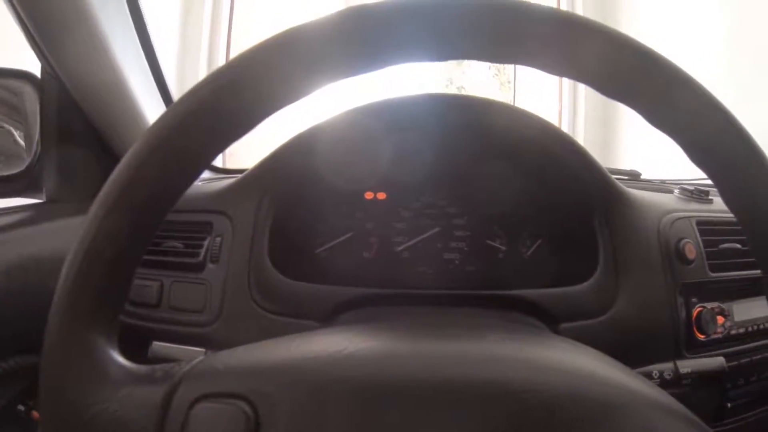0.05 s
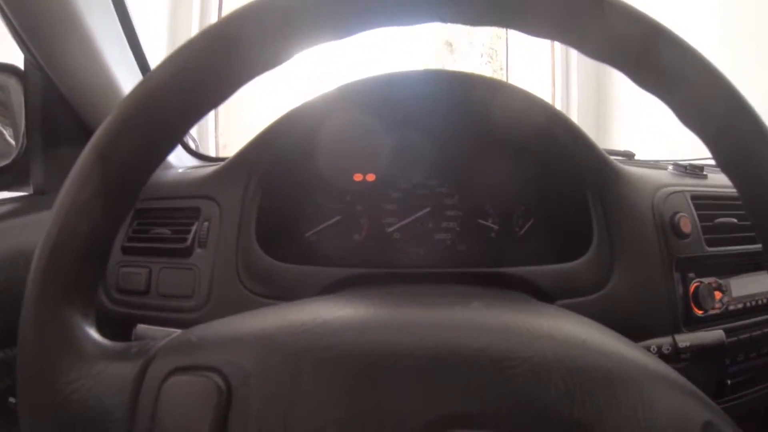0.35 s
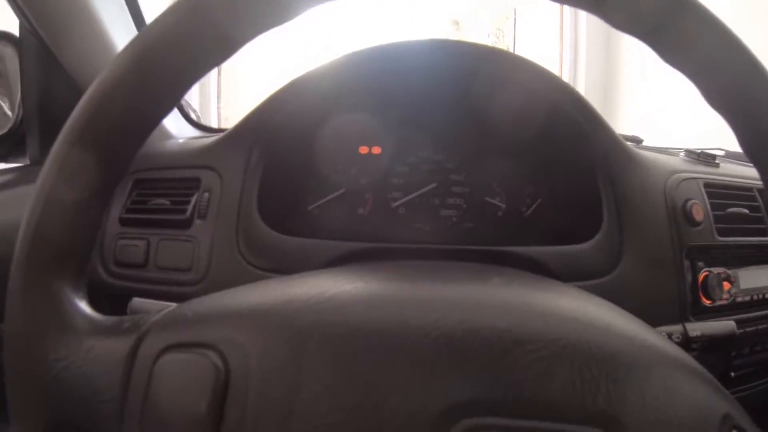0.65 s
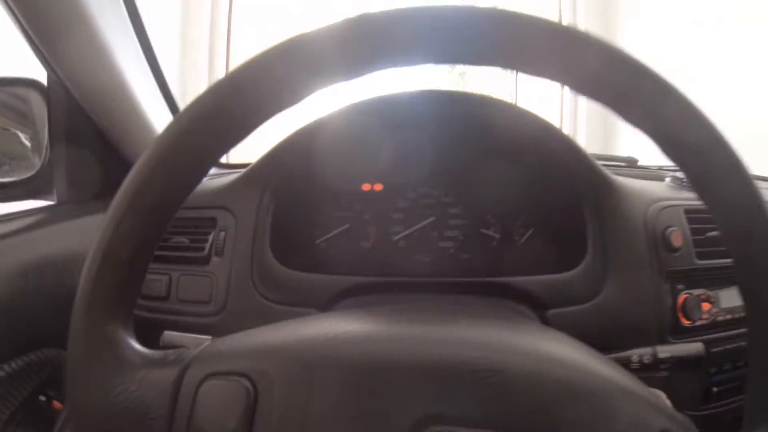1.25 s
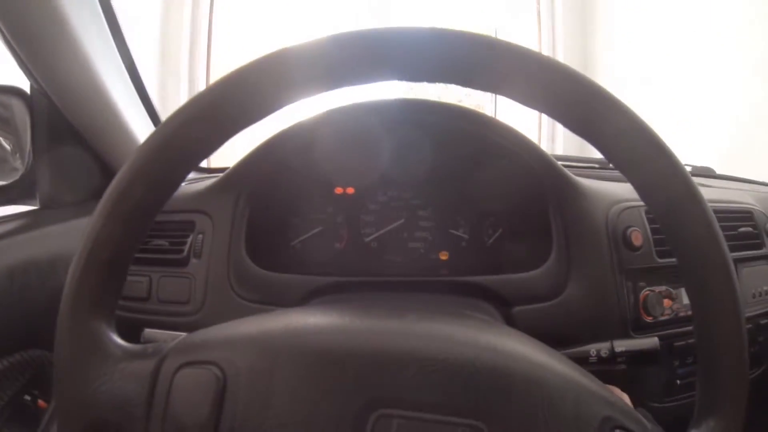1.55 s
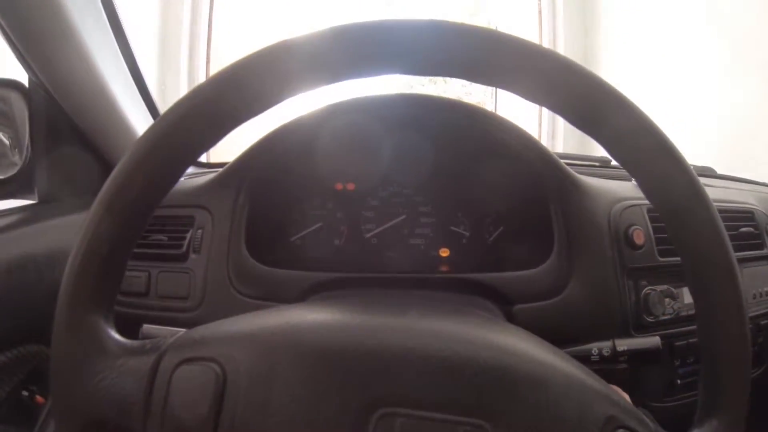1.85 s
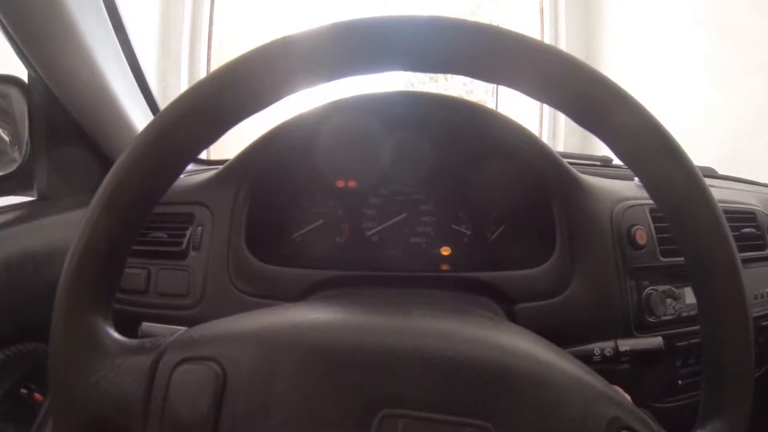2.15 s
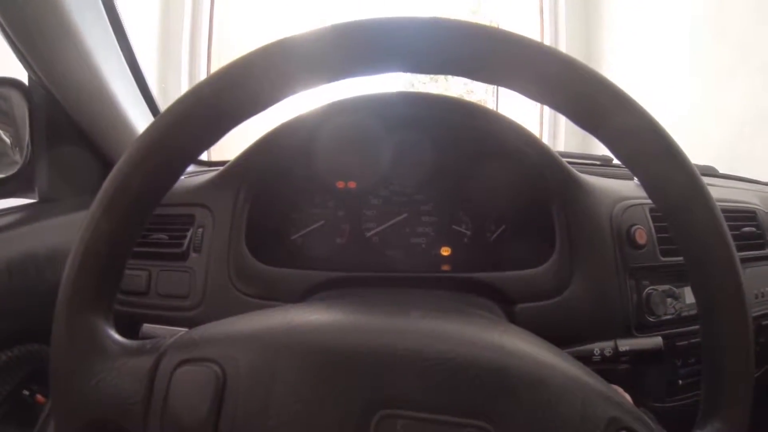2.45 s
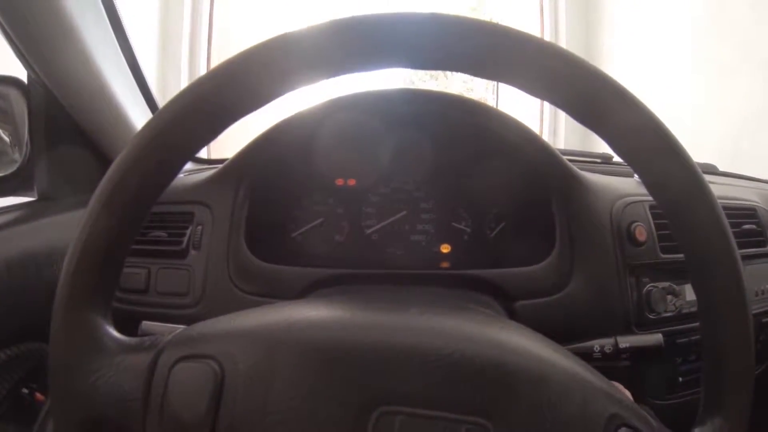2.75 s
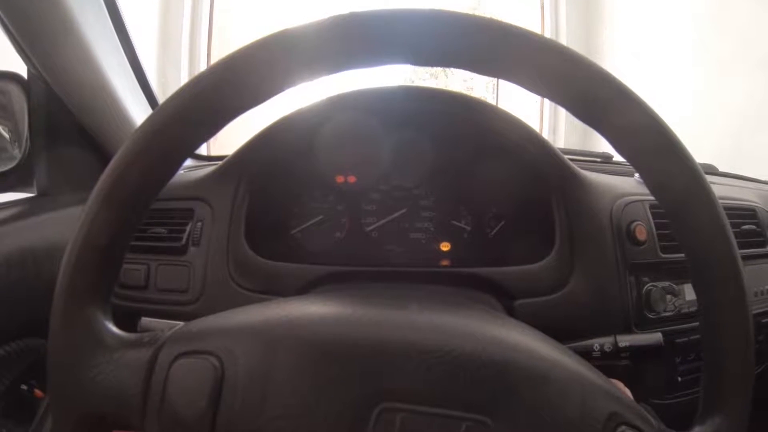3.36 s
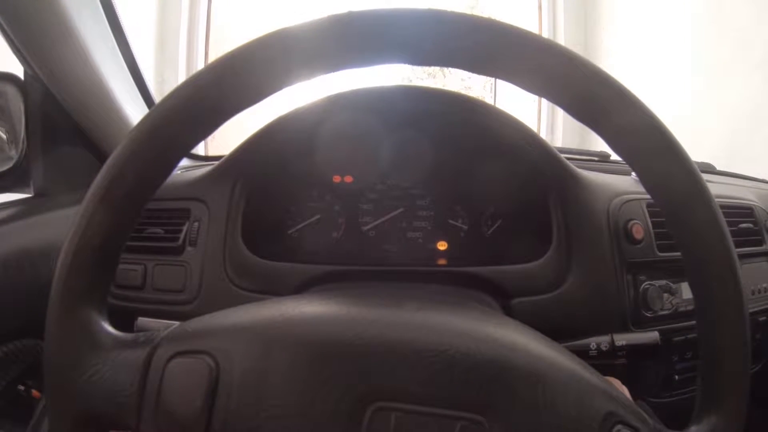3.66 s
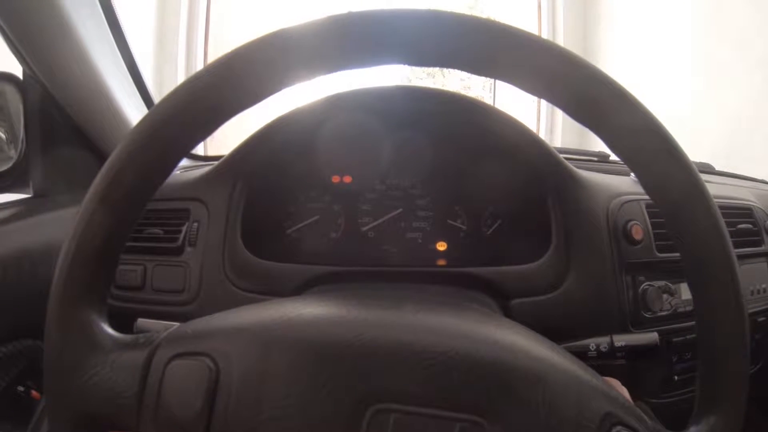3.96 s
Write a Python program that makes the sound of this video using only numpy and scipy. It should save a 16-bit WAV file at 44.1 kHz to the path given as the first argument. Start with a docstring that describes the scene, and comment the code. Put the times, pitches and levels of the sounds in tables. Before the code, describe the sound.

A car starts, heard close up from the driver's seat. Clothes rustle, a pedal squeaks and thuds, and the key clicks. The starter grinds and whines in pulses, then the engine catches with low, uneven thumping.

```python
"""A parked car starting, heard close up from the driver's seat on one microphone.
Over a faint cabin rumble, clothes rustle, a pedal squeaks and thuds home, and the key clicks round.
At 1.6 s the starter's pinion crashes in and spins up. From 2 s its gears whine and rasp under each
compression stroke, sagging in pitch against the resonances of the housing. Just after 3 s the engine
first fires; it throws the starter off and begins to run with a low, uneven thumping."""
import sys
import numpy as np
from scipy import signal
from scipy.fft import rfft, irfft
from scipy.io import wavfile

SR = 44100
rng = np.random.default_rng(int(sys.argv[2]) if len(sys.argv) > 2 else 0)


def transcribe(signal):
    """Save signal, clipped to [-1, 1], as a 16-bit WAV file at the path in sys.argv[1]."""
    frames = np.atleast_2d(signal).T
    limited = np.clip(frames, -1, 1)
    pcm = np.round(limited * 32767).astype(np.int16)
    wavfile.write(sys.argv[1], SR, pcm)


N = 176400
T = np.arange(N) / SR

# the starter spinning up: (time [s], gear pitch [Hz], grinding level [dB])
STARTER_RUN_UP = [(1.615, 1387, -44), (1.64, 1425, -34), (1.70, 1520, -29.5), (1.78, 1914, -27.5),
                  (1.87, 2069, -27.5), (1.93, 1911, -24.5), (2.03, 1750, -37), (2.10, 1660, -71)]
MESH_S = 1.618  # the pinion meets the ring gear
LOW_GEAR_RATIO = .56  # pitch of the slower gear pair over that of the faster
SAG_S = .082  # how long a compression slows the starter


def from_db(db):
    """Decibels to gain."""
    return 10 ** (np.asarray(db) / 20)


def rms_one(x):
    """Scale to unit power."""
    return x / np.sqrt(np.mean(x ** 2) + 1e-20)


def in_time(rows):
    """Each column of a curve at every sample."""
    times, *columns = np.transpose(rows)
    return [np.interp(T, times, column) for column in columns]


def coloured(spectrum, x):
    """Shape x by (frequency [Hz], level [dB]) points, falling away below the first; rms 1."""
    hz, db = np.transpose(spectrum)
    f = np.maximum(np.fft.rfftfreq(N, 1 / SR), 1)
    skirt = np.minimum(f / hz[0], 1) ** 2
    gain = from_db(np.interp(np.log(f), np.log(hz), db))
    return rms_one(irfft(rfft(x) * skirt * gain, N))


def noise(spectrum):
    """Steady noise of a given colour."""
    return coloured(spectrum, rng.standard_normal(N))


def drift(rate_hz):
    """Random wander, mostly slower than rate_hz; rms 1."""
    rolloff = 1 + (np.fft.rfftfreq(N, 1 / SR) / rate_hz) ** 2
    return rms_one(irfft(rfft(rng.standard_normal(N)) / rolloff, N))


def envelope(start, attack, hold, release):
    """Straight rise, hold and exponential fall, all in seconds."""
    rise = np.clip((T - start) / attack, 0, 1)
    return rise * np.exp(-np.maximum(T - start - attack - hold, 0) / release)


def tone(hz):
    """A sine of rms 1 on a moving pitch."""
    return np.sqrt(2) * np.sin(2 * np.pi * np.cumsum(hz) / SR)


def dulled(x, hz):
    """Second-order low-pass."""
    return signal.sosfilt(signal.butter(2, hz, fs=SR, output="sos"), x + 1e-18)


def struck(hits, modes, scatter_db=1.5):
    """Every hit rings every mode with a strength of its own."""
    times, db = np.transpose(hits)
    out = np.zeros(N)
    for hz, mode_db, t60 in modes:
        blows = np.zeros(N)
        scatter = scatter_db * rng.standard_normal(len(times))
        blows[(times * SR).astype(int)] = from_db(db + mode_db + scatter)
        r, w = np.exp(-np.log(1000) / (t60 * SR)), 2 * np.pi * hz / SR
        out += signal.lfilter([0, np.sin(w)], [1, -2 * r * np.cos(w), r * r], blows + 1e-18)
    return out


def resonate(x, peaks):
    """Narrow resonances in parallel."""
    out = 0
    for hz, width, db in peaks:
        r, w = np.exp(-np.pi * width / SR), 2 * np.pi * hz / SR
        feed = np.array([1, 0, -1]) * (1 - r * r) / 2
        out += from_db(db) * signal.lfilter(feed, [1, -2 * r * np.cos(w), r * r], x + 1e-18)
    return out


def cabin_reverb(x, t60=.11, wet_db=1.5):
    """Dense, quickly dying reflections from glass and trim around the microphone; power is kept."""
    tail = rng.standard_normal(N) * from_db(-60 * T / t60)
    wet = signal.fftconvolve(x, tail[:SR // 4] / np.sqrt(np.sum(tail ** 2)))[:N]
    return (x + from_db(wet_db) * wet) / np.hypot(1, from_db(wet_db))


def engine_bay(x):
    """Add a few early echoes from the bulkhead and bonnet."""
    # paths round the bay: (delay [s], level [dB])
    echoes = [(.0047, -17), (0.0129, -12.5), (0.0177, -11), (.0287, -20.5), (.041, -13)]
    return x + sum(from_db(db) * np.interp(T - delay, T, x, left=0) for delay, db in echoes)


def cabin_tone():
    """The room tone of the parked car: a faint, steady rumble."""
    # its spectrum: (frequency [Hz], level [dB])
    colour = [(12, -21), (20, 4.5), (38, -6.5), (97, -15), (347, -34), (387, -37), (1390, -65.5),
              (1830, -54), (2160, -44.5), (3970, -42.5), (15000, -54)]
    return from_db(-54) * noise(colour)


def rustle():
    """The driver's foot and clothes rustle near the microphone."""
    # the driver's movement: (time [s], level [dB])
    movement = [(0, -66.5), (.2, -57), (.45, -58.5), (.7, -60), (.85, -63), (1.2, -63), (1.5, -65.5)]
    # rubbing cloth: (frequency [Hz], level [dB])
    cloth = [(150, 1.5), (600, -6.5), (1200, -10.5), (2500, -15), (4000, -27), (8000, -37)]
    return from_db(in_time(movement)[0]) * noise(cloth)


def pedal_squeak():
    """Down in the footwell the pedal gives one short, wavering squeak."""
    # its partials: (frequency [Hz], level [dB], waver [share of frequency])
    partials = [(1700, -54, 0.0056), (1810, -55, 0.02), (2065, -55.5, 0.011), (3420, -62, 0.012),
                (3763, -73, 0.0066), (5180, -69, 0.011), (8500, -71.5, .005)]
    squeak = sum(from_db(db + 3.6 * drift(70)) * tone(hz * (1 + waver * drift(110)))
                 for hz, db, waver in partials)
    return squeak * envelope(start=.22, attack=.011, hold=.05, release=.054)


def clicks():
    """Pedal, key and solenoid click, each a short burst of noise."""
    # the clicks: (time [s], level [dB], t60 [s], low-pass [Hz])
    contacts = [(0.439, -42.5, .06, 900), (0.472, -34.5, 0.14, 1200), (0.535, -42.5, 0.14, 1200),
                (0.6, -47, 0.048, 1500), (.66, -52.5, 0.39, 3000), (.765, -50.5, .035, 3480),
                (0.898, -44, 0.047, 1590), (1.080, -38.5, 0.033, 3340), (1.117, -36.5, 0.12, 1310),
                (1.162, -41.5, 0.052, 1510), (1.203, -42.5, 0.067, 1510), (1.240, -50, 0.043, 1780),
                (1.565, -46.5, 0.36, 1470), (1.594, -30.5, 0.081, 7000)]
    # their common spectrum: (frequency [Hz], level [dB])
    colour = [(200, -15.5), (500, -1), (850, 5), (1350, -5), (1900, 4.5), (2600, -8.5), (3500, -5),
              (5000, -21), (7000, -22), (8500, -18), (15000, -15)]
    crack = noise(colour)
    return sum(dulled(from_db(db) * envelope(start, .0012, .0013, t60 / np.log(1000)) * crack, hz)
               for start, db, t60, hz in contacts)


def lock_knocks():
    """At arm's length the ignition lock knocks and rings as the key turns."""
    # blows on the lock: (time [s], level [dB])
    knocks = [(1.116, -26), (1.161, -39), (1.197, -37)]
    # modes of the lock: (frequency [Hz], level [dB], t60 [s])
    lock_modes = [(130.4, -12, 0.32), (221, -5.5, .1), (376, 1, 0.098), (438, -7, 0.065), (604, -11, 0.069),
                  (885, -15, 0.14), (1098, -32, .07), (1760, -7, 0.035)]
    return dulled(struck(knocks, lock_modes), hz=1600)


def panel_thuds():
    """Panels boom with two weak, unsteady overtones."""
    # thuds of the pedal and the first compression: (time [s], level [dB], pitch [Hz], t60 [s])
    thuds = [(0.436, -42, 267, 0.091), (0.473, -39, 239, .07), (0.493, -23, 69.6, 0.5),
             (.532, -40, 211, .3), (2.050, -25.5, 137.2, 0.4)]
    out = np.zeros(N)
    for start, db, hz, t60 in thuds:
        phase = 2 * np.pi * hz * (T - start)
        overtones = sum(drift(50) * np.sin(k * phase) / (k - 1) for k in (2, 3))
        boom = np.sin(phase) + from_db(-13) * overtones
        out += from_db(db) * envelope(start, .0053, .0091, t60 / np.log(1000)) * boom
    return out


def gear_noise(spectrum, chatter_db, teeth_per_s=205, tooth_depth=.12):
    """Scraping that pulses with the pinion teeth, chatters unevenly and echoes in the cabin."""
    tooth_hz = teeth_per_s * (1 + .25 * drift(15.43))
    teeth = np.maximum(1 + tooth_depth * tone(tooth_hz), 0)
    scrape = cabin_reverb(rng.standard_normal(N))
    chatter = from_db(chatter_db * drift(70))
    return coloured(spectrum, scrape * teeth * chatter)


def engine_turning(start_s=1.4):
    """Beyond the bulkhead the valve train clatters and the engine rumbles as it turns."""
    # from cranking to running: (time [s], clatter level [dB], rumble level [dB])
    levels = [(1.54, -70, -58), (1.65, -43, -34.5), (2.0, -41.5, -35.5), (2.25, -37.5, -28),
              (2.7, -41, -30), (3.05, -35.5, -27.5), (3.25, -37, -22.5), (3.45, -39, -28),
              (3.55, -35, -21.5), (3.72, -36.5, -18), (3.86, -33, -15), (4.0, -36.5, -26.5)]
    # valve-train clatter: (frequency [Hz], level [dB])
    clatter_colour = [(120, -3), (200, -1), (253, -12), (370, -21), (476, -14.5), (550, -16.5), (775, -15),
                      (980, -4.5), (1090, -13), (1570, -9.5), (1810, 0), (2600, -18), (3470, -17.5),
                      (6080, -30.5), (8410, -29.5), (13700, -46), (15000, -47)]
    # engine rumble: (frequency [Hz], level [dB])
    rumble_colour = [(8.8, -89), (15, 8), (31, 7.5), (53, 3.5), (130, -25.5), (222, -26.5), (280, -32.5),
                     (312, -25.5), (400, -44), (520, -20), (880, -120)]
    clatter_db, rumble_db = in_time(levels)
    clatter = from_db(clatter_db) * gear_noise(clatter_colour, chatter_db=.24)
    rumble = from_db(rumble_db) * noise(rumble_colour)
    return np.clip((T - start_s) / .02, 0, 1) * (clatter + rumble)


def engine_firing():
    """Each firing thumps the car's body and chuffs through the exhaust."""
    # cylinders firing: (time [s], level [dB])
    firings = [(3.129, -16.5), (3.449, -20), (3.505, -11.5), (3.557, -15.5), (3.614, -24), (3.681, -19),
               (3.712, -18.5), (3.78, -18), (3.851, -20), (3.905, -19), (3.966, -24.5)]
    # modes of the body: (frequency [Hz], level [dB], t60 [s])
    body_modes = [(18.4, 5.5, 0.24), (40.03, 0, 0.18), (61, -4, 0.27), (124.86, -19, 0.11),
                  (174.9, -15.5, 0.16), (243, -29, 0.1)]
    # exhaust chuff: (frequency [Hz], level [dB])
    exhaust = [(70, -4), (120, 6.5), (180, -1), (250, -3.5), (320, -14), (600, -23.5), (1200, -40.5)]
    thumps = dulled(struck(firings, body_modes), hz=299)
    puffs = sum(from_db(db - 21) * envelope(start, .0085, .019, .058) for start, db in firings)
    return thumps + puffs * noise(exhaust)


def starter_spin_up():
    """The pinion crashes in and grinds while the slower gear pair climbs in pitch, then eases back."""
    # pinion hitting the ring gear: (frequency [Hz], level [dB])
    crash_colour = [(150, -60), (250, -24.5), (748, -21), (1000, -10), (1270, -17), (1390, -5), (1540, -8),
                    (1860, 1.5), (2130, -5.5), (3940, -16.5), (4300, -27.5), (8240, -41.5), (15000, -53)]
    # grinding teeth: (frequency [Hz], level [dB])
    grind_colour = [(150, -60), (250, -31), (418, -18), (748, -10), (858, -1.5), (1290, -5), (1410, 2),
                    (1480, -10.5), (1820, 0.5), (2320, -4.5), (2610, -16), (3270, -14.5), (5850, -36.5),
                    (8240, -32.5), (15000, -54)]
    gear_hz, db = in_time(STARTER_RUN_UP)
    low_hz = LOW_GEAR_RATIO * gear_hz * (1 + .0309 * drift(155))
    whine = from_db(-10.5) * engine_bay(tone(low_hz) + tone(2 * low_hz))
    impact = from_db(-22.5) * envelope(MESH_S, attack=.0087, hold=.019, release=.053)
    crash = impact * gear_noise(crash_colour, chatter_db=1.5)
    grind = gear_noise(grind_colour, chatter_db=-.2)
    return crash + from_db(db) * (T > MESH_S) * (grind + whine)


def gear_whine(hz):
    """Two meshing gear pairs with their octaves and sidebands."""
    # sidebands of a gear running out of true: (frequency [multiple of gear pitch], level [dB])
    sidebands = [(.89, -10), (.945, -7.5), (1.055, -11), (1.11, -22)]
    partials = [(1, 0), (2, -17), (LOW_GEAR_RATIO, -7.5), (2 * LOW_GEAR_RATIO, -26), *sidebands]
    return sum(from_db(db) * tone(ratio * hz) for ratio, db in partials)


def whine_swell(start, attack=.033):
    """The whine swells as the piston compresses, then drops to a faint singing."""
    rise = np.clip((T - start) / attack, 0, 1)
    howl = envelope(start, attack, hold=.019, release=.043)
    singing = from_db(-22) * envelope(start, attack, hold=SAG_S, release=.064)
    return rise * (howl + singing)


def starter_cranking(recover_hz_per_s=1200):
    """The starter whines up to speed; then each compression loads it: it howls, slows and recovers."""
    # compression strokes: (time [s], gear pitch [Hz], sag [Hz/s], whine level [dB], rasp level [dB],
    # roughness [share of pitch])
    strokes = [(2.034, 1799, 2405, -16, -25.5, .018), (2.243, 1867, 2395, -15, -27.5, 0.019),
               (2.423, 1944, 2997, -14, -27, .018), (2.602, 1946, 2995, -14, -28, .018),
               (2.772, 1951, 3019, -15.5, -27.5, 0.017), (2.945, 1942, 2999, -14.5, -28, .018),
               (3.258, 2199, 1695, -21.5, -29.5, .04), (3.390, 2153, 1590, -21, -28.5, 0.046)]
    # resonances of the starter and its housing: (frequency [Hz], width [Hz], level [dB])
    housing_modes = [(825, 11, -6), (892.3, 30, 2), (961, 11.3, -6.5), (1032, 11, -0.5), (1332, 21, 8),
                     (1557, 52, -3), (1689, 12.4, -0.5), (1807, 20, -6), (1820.4, 24, -3), (1884, 15.4, 0),
                     (1994, 15, 5.5), (1993, 9, -5), (2164, 25, -3), (2280, 11, 7.5)]
    # narrow rings of the gear casing: (frequency [Hz], width [Hz], level [dB])
    casing_modes = [(2873, 34, 1.5), (3097, 34, 5), (3450, 28, -19.5), (3936, 45, -6.5), (4400, 9.9, 3),
                    (5110, 98, -5.5)]
    # teeth rasping under load: (frequency [Hz], level [dB])
    rasp_colour = [(200, -7), (330, -13.5), (500, -5.5), (660, -9), (950, 2), (1250, -4.5), (1750, 3.5),
                   (2250, -4.5), (2700, -11), (4000, -17.5), (5200, -26.5), (6300, -34.5), (7500, -28.5),
                   (8400, -21), (9500, -37.5), (10700, -30.5), (12300, -52), (14000, -34.5), (15500, -46)]
    spin_hz, spin_db = in_time(STARTER_RUN_UP)
    spin = from_db(spin_db) * (T > MESH_S)
    jitter = drift(150.4)
    pitch = spin_hz * (1 + .03997 * jitter)
    howl, load = from_db(-10) * spin, 0
    for start, top_hz, sag_rate, whine_db, rasp_db, roughness in strokes:
        age = np.maximum(T - start, 0)
        recovery = recover_hz_per_s * np.maximum(age - SAG_S, 0)
        sag = np.maximum(sag_rate * np.minimum(age, SAG_S) - recovery, 0)
        pitch = np.where(T < start, pitch, (top_hz - sag) * (1 + roughness * jitter))
        howl += from_db(whine_db) * whine_swell(start)
        load += from_db(rasp_db) * envelope(start, attack=.051, hold=.038, release=.053)
    gears = howl * gear_whine(pitch) * from_db(3.34 * drift(98))  # the level flutters
    whine = engine_bay(resonate(gears, housing_modes) + from_db(-16) * gears)
    casing_ring = rms_one(resonate(rng.standard_normal(N), casing_modes))
    casing = from_db(-14.5) * (load + .4 * spin) * casing_ring
    rasp = load * gear_noise(rasp_colour, chatter_db=.4)
    return whine + casing + rasp


def scene():
    """Everything as heard from the driver's seat, in mono."""
    machinery = starter_spin_up() + starter_cranking() + engine_turning() + engine_firing()
    interior = panel_thuds() + pedal_squeak() + clicks() + rustle() + lock_knocks() + cabin_tone()
    return (machinery + interior)[None]


def record(dry, low_cut_hz=14, high_cut_hz=15050):
    """The microphone chain cuts the deepest bass and, steeply, the top."""
    low_cut = signal.butter(2, low_cut_hz, "high", fs=SR, output="sos")
    high_cut = signal.ellip(10, .2, 80, high_cut_hz, fs=SR, output="sos")
    return signal.sosfilt(high_cut, signal.sosfilt(low_cut, dry))


dry = scene()
out = record(dry)
transcribe(out)
```